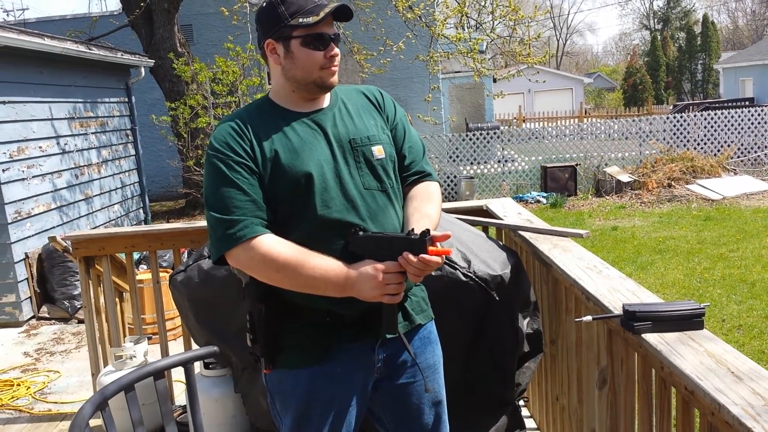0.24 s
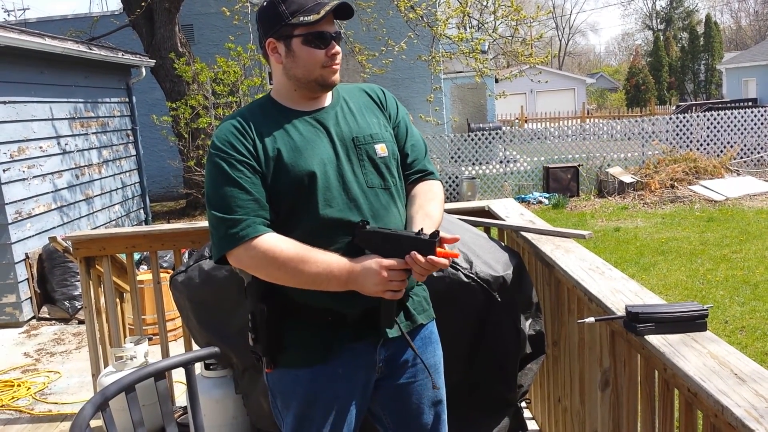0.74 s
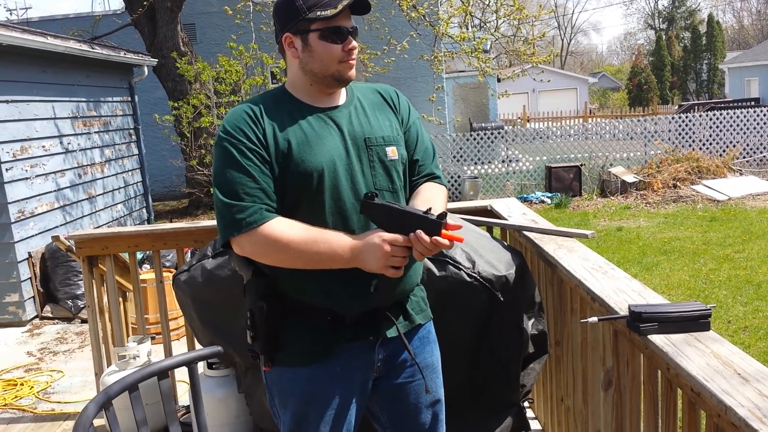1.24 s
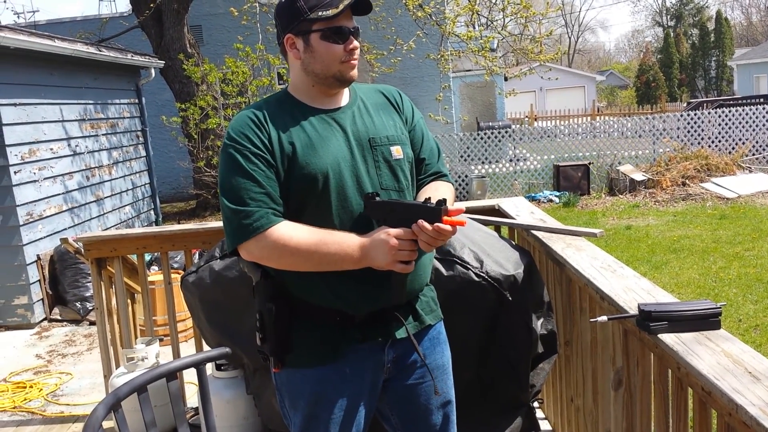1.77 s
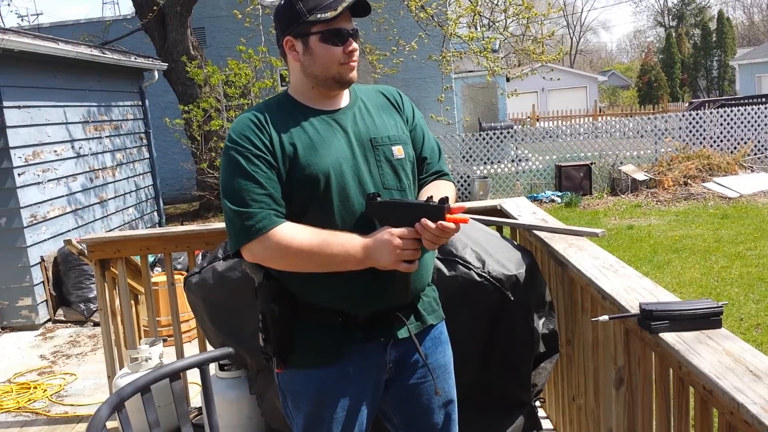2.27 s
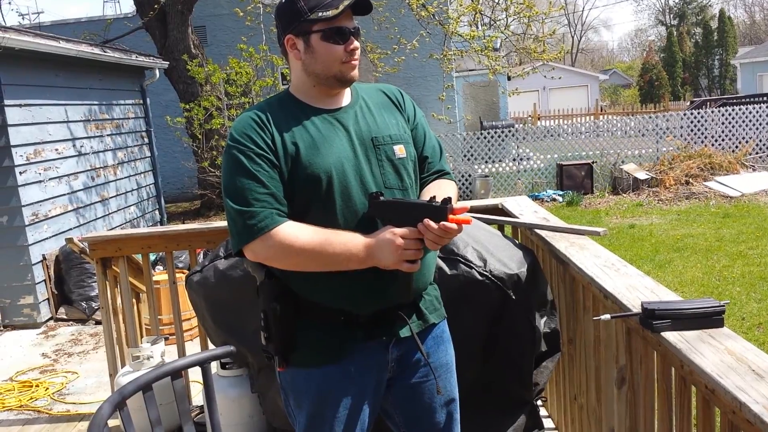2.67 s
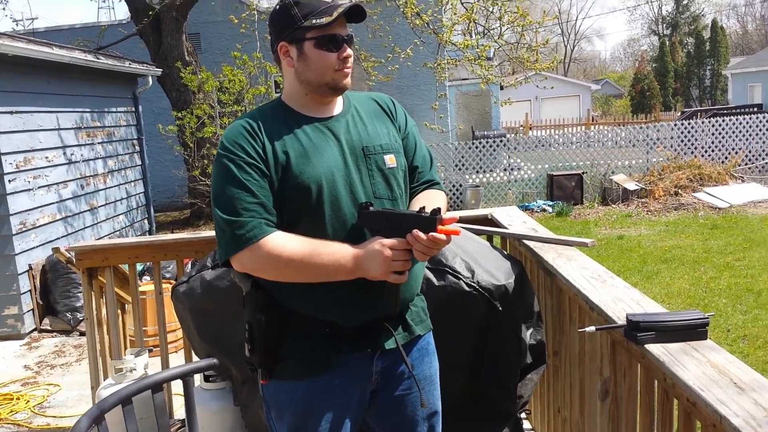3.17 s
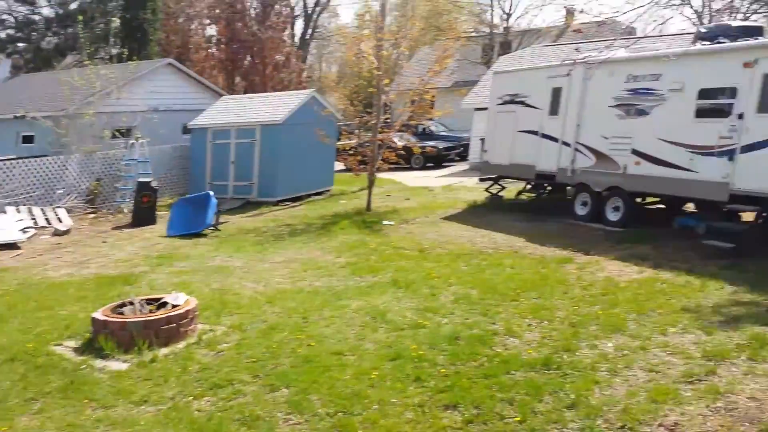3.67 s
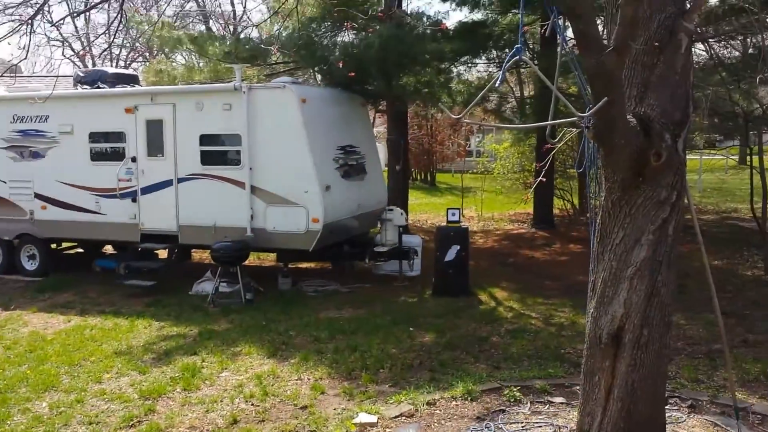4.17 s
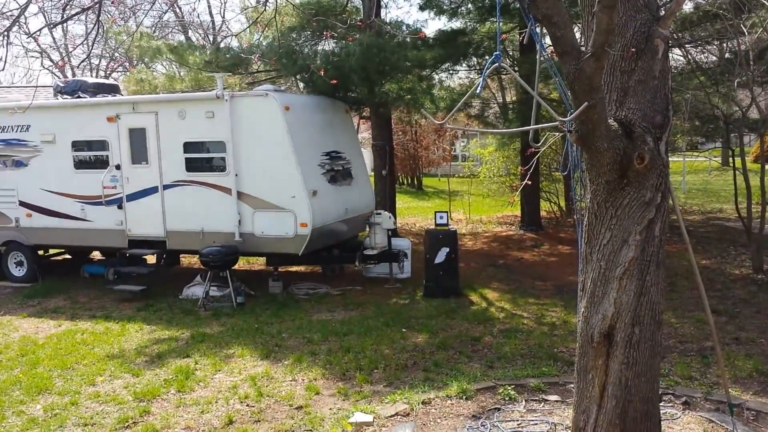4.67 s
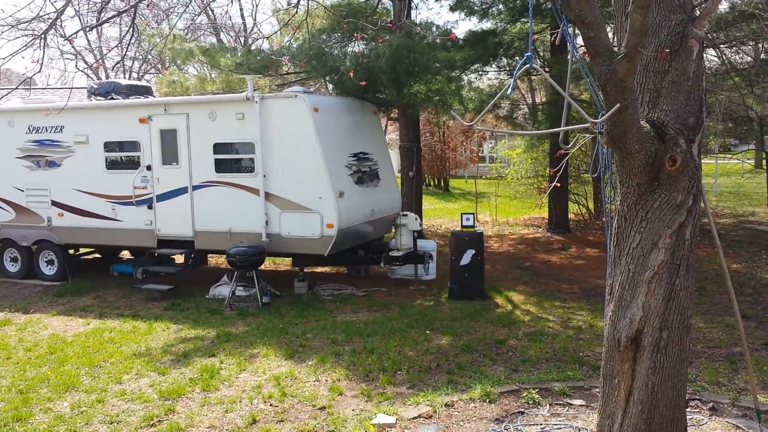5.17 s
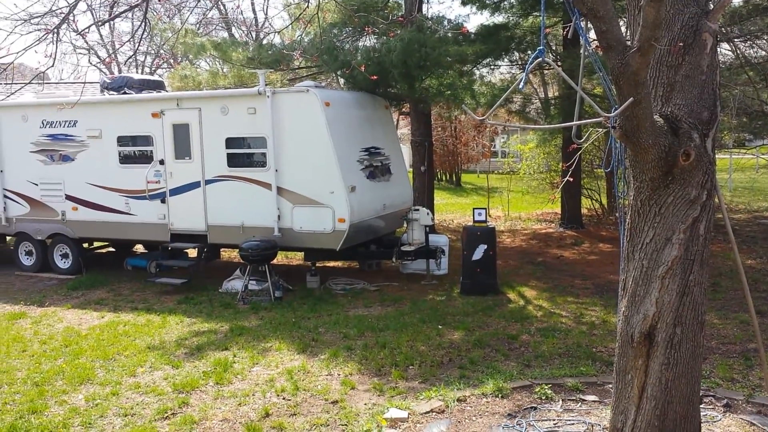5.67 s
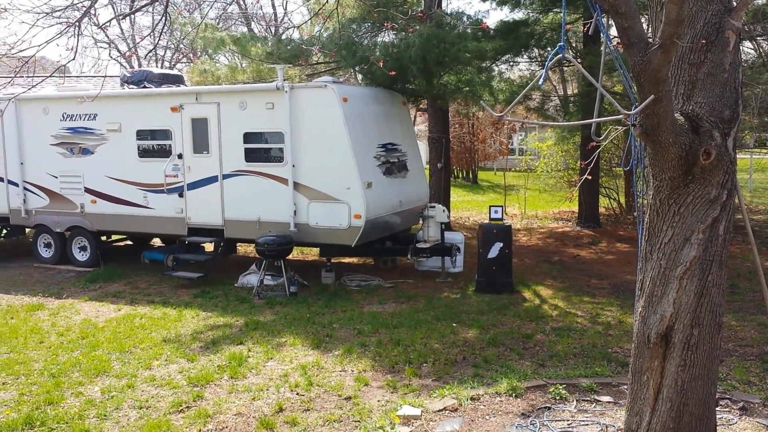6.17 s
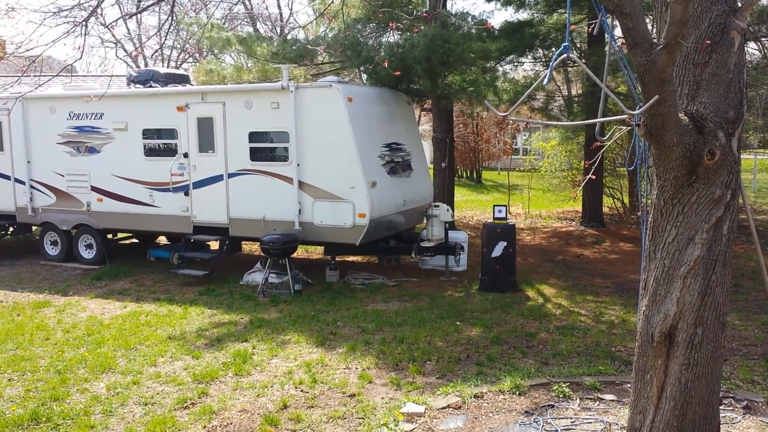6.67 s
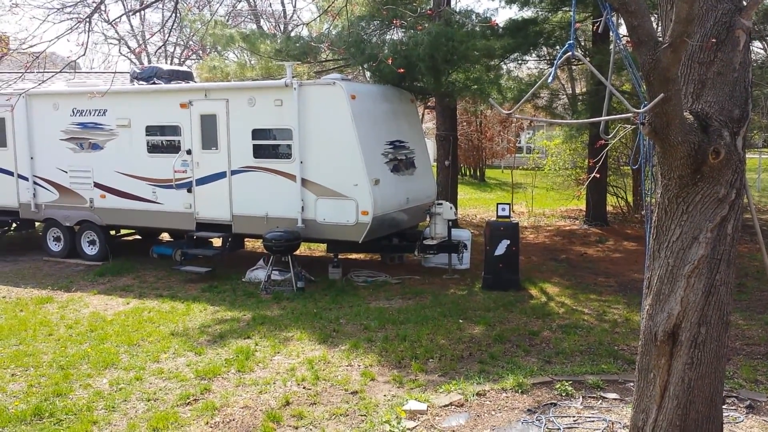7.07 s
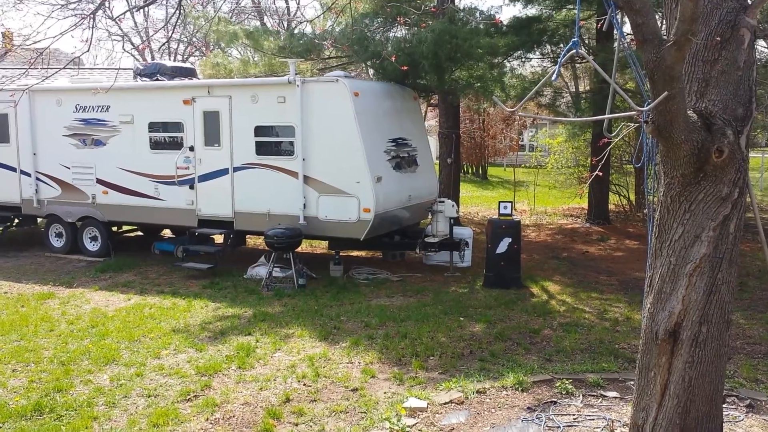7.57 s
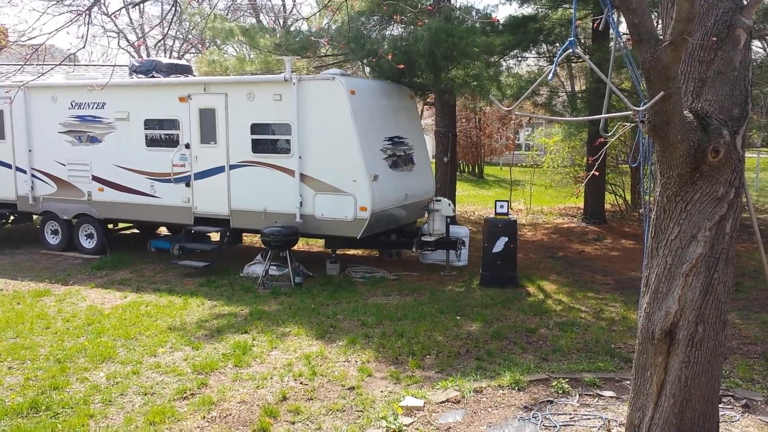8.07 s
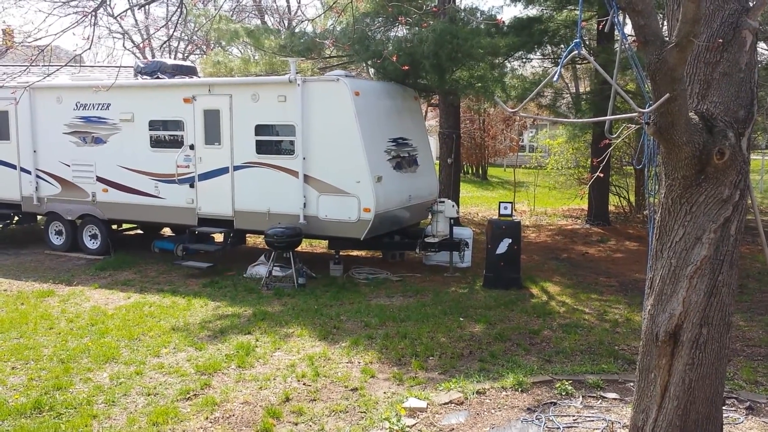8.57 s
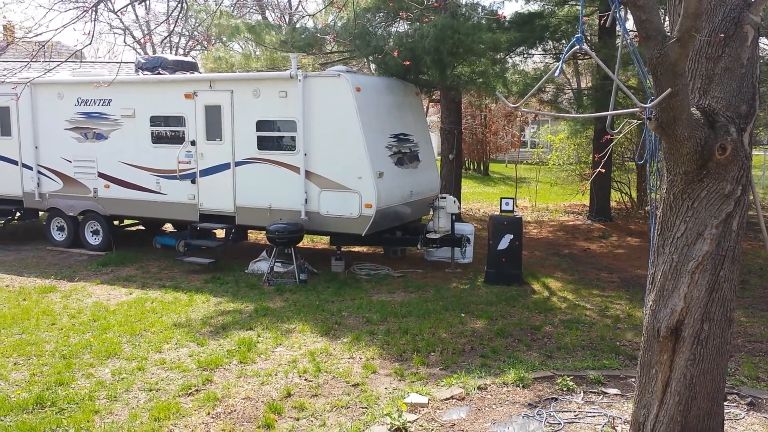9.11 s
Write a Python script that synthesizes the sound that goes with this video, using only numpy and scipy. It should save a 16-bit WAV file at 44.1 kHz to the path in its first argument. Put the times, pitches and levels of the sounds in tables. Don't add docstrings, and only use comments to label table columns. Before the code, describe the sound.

A small electric pellet gun rattles off five steady bursts of sharp plastic clacks outdoors, with loose pellets shaken in the pauses.

```python
import sys
import numpy as np
from scipy import signal
from scipy.fft import rfft, irfft, next_fast_len
from scipy.io import wavfile
from scipy.ndimage import uniform_filter1d, minimum_filter1d, map_coordinates

SR = 44100
rng = np.random.default_rng(int(sys.argv[2]) if len(sys.argv) > 2 else 0)


def master(y):
    cut = np.clip(np.atleast_2d(y).T, -1, 1)
    pcm = np.round(cut * 32767)
    wavfile.write(sys.argv[1], SR, pcm.astype(np.int16))


def attenuation_scalar(level_db):
    decades = np.asarray(level_db, float) / 20
    return 10 ** decades


N = 411978


def along(points, hz, axis=1):
    table = np.array(points)
    return np.interp(np.log(hz + 1), np.log(table[:, 0] + 1), table[:, axis])


def curve(rows, outside=()):
    s, value = np.transpose(rows)
    return np.interp(np.arange(N) / SR, s, value, *outside)


def coloured(x, gain_db):
    size = next_fast_len(x.shape[-1] + 4096, True) // 2 * 2
    gain = attenuation_scalar(gain_db(np.fft.rfftfreq(size, 1 / SR)))
    cepstrum = irfft(np.log(gain + 1e-6), size)
    cepstrum[1:size // 2] *= 2
    cepstrum[size // 2 + 1:] = 0
    return irfft(rfft(x, size) * np.exp(rfft(cepstrum)), size)[..., :x.shape[-1]]


def unit(x):
    return x / np.sqrt(np.mean(x ** 2) + 1e-20)


def pair(source, alike):
    turn = np.arccos(np.clip(alike, -1, 1)) / 2
    shared, apart = np.cos(turn) * source(), np.sin(turn) * source()
    return np.array([shared + apart, shared - apart])


def wobble(rate):
    knots = rng.standard_normal(int(N * rate / SR) + 4)
    return map_coordinates(knots, [np.arange(N) * rate / SR])


def shaped(x, envelope):
    noise = x * envelope
    return noise * np.linalg.norm(envelope) / np.linalg.norm(noise, axis=1, keepdims=True)


# frequency in [Hz], level in [dB].
YARD = [(18, -25), (30, 5.5), (167, -2), (460, 3), (524, -1.5), (1600, -2.5), (2190, 1), (3500, -23),
        (6360, -20), (12500, -46), (15000, -49)]
# start in [s], level in [dB], pitch in [Hz].
PUFF = (2.92, -10, 113)


def yard():
    air = coloured(pair(lambda: rng.standard_normal(N), 0.87), lambda hz: along(YARD, hz))
    low_pass = signal.butter(2, 300, fs=SR, output="sos")
    breeze = signal.sosfilt(low_pass, rng.standard_normal((2, N)))
    flutter = attenuation_scalar(2 * wobble(1.5) + 3 * np.array([wobble(9), wobble(9)]))
    gusts = attenuation_scalar([[-68], [-72]]) * flutter
    s, db, hz = PUFF
    late = np.maximum(np.arange(N) / SR - s, 0)
    puff = attenuation_scalar(db - 60 * late / 0.011) * np.sin(2 * np.pi * hz * late) * attenuation_scalar([[4], [-4]])
    return attenuation_scalar(-60.0 + wobble(1.7)) * unit(air) + gusts * unit(breeze) + puff


# slam in [s], slam level in [dB], nozzle click earlier by [ms], click level in [dB].
FIRST = [(.0032, 3, 23.5, -60), (0.1225, -3, 24, -5.5), (0.241, 2.5, 23.9, -4.5), (0.3611, 3, 25, -5),
         (0.4809, 3, 23.8, -4), (.601, 4, 29, -32), (0.7216, 2.5, 23.3, -5.5), (0.8412, 2.5, 24, -4.3),
         (0.9615, -1, 25.6, -8.5)]
SECOND = [(1.957, -4.5, 36, -0.5), (2.0797, -5.3, 23.73, -3.5), (2.1995, 1.5, 26.2, -21),
          (2.3209, -3.5, 24.64, -5), (2.4394, 1, 22.26, -3), (2.5604, 2.5, 24.3, -8),
          (2.6804, 1, 23.8, -4.5), (2.8009, 2, 24.07, -4.5), (2.92, 4.5, 26.4, -34), (3.0415, 3, 26.3, -35),
          (3.164, -7, 26.1, -7), (3.2832, 3, 23.6, -5.5), (3.4047, 0.5, 23.7, 1.5),
          (3.5245, 3, 21.76, -3.5), (3.6451, -1, 24.45, -1.5), (3.7664, 1.5, 29.1, -34),
          (3.8861, -9.5, 22.96, -5.5), (4.0065, -2, 23.9, -10), (4.1267, -2.5, 24.26, -11),
          (4.247, -1.5, 23.5, -60), (4.3698, -8.5, 23.5, -60), (4.4893, -7, 22.87, -9),
          (4.6093, -5, 26.9, -41), (4.7288, -3.5, 24.4, -45), (4.8507, -15, 25, -12)]
THIRD = [(5.4788, -16.5, 27.1, -13), (5.6, -6.5, 23.53, -13.5), (5.7193, -4, 21.43, -10),
         (5.8411, 2.5, 23.5, -60), (5.9625, -10, 22.9, -6.5), (6.0832, -3.5, 23.9, -5.5),
         (6.2046, -1.5, 25.13, -7), (6.3251, -3, 24.26, -8), (6.445, 0, 25.2, -7),
         (6.5662, -0.5, 23.14, -7.5), (6.688, -2, 24.2, -8.5), (6.8092, -2, 22.84, -5.5)]
FOURTH = [(7.3483, -5.5, 28.9, -11), (7.4717, -2.5, 23.4, -7.5), (7.5925, -4.5, 23.5, -60),
          (7.715, -8, 25.2, -7.5), (7.8355, -4, 23.5, -60), (7.9568, -10, 23.1, -11),
          (8.0782, -1.5, 23.8, -10)]
FIFTH = [(8.5296, -11, 31.1, -14.5), (8.6526, -10.5, 23.5, -60), (8.778, -10.5, 25.4, -4),
         (8.897, -9, 23.86, -14), (9.0182, -1, 25.15, -8), (9.1391, -3, 23.55, -7),
         (9.261, -3.5, 25.6, -6.5)]
SILENT_DB = -45


def contacts():
    s, slam_db, lead_ms, click_db = np.transpose(FIRST + SECOND + THIRD + FOURTH + FIFTH)
    heard = click_db > SILENT_DB
    slams = np.c_[s, slam_db]
    clicks = np.c_[s - lead_ms / 1000, click_db][heard]
    rows = np.r_[slams, clicks]
    return rows, np.arange(len(rows)) >= len(s)


def after(marks, shape):
    return np.abs(signal.fftconvolve(marks, shape)[:N])


def lull(depth):
    rows, click = contacts()
    starts = np.maximum(rows[~click, 0] - .0165, 0)
    marks = np.bincount(np.round(starts * SR).astype(int), minlength=N)
    return 1 - np.clip(depth * after(marks, np.hanning(800)), 0, 1)


# time in [s], level in [dB].
GEARS = [
    [(0, -41.5), (.97, -42), (1.07, -55)],
    [(1.92, -39.5), (3.5, -40.5), (4, -43.5), (4.86, -50), (4.95, -62)],
    [(5.45, -45), (6.82, -41), (6.92, -52)],
    [(7.32, -43), (8.09, -45.5), (8.18, -56.5)],
    [(8.5, -44.5), (9.34, -42)],
]
# frequency in [Hz], level in [dB].
WHIRR = [(150, -14), (600, -9), (1100, -11), (1500, -7.5), (1850, 3), (2030, 0.5), (2220, -3), (2700, -5.5),
         (3500, -8.5), (7000, -26), (14000, -16)]
# share of speed [0-1], arch length in [s].
ARCH = (.1, .1)


def gears():
    rows, click = contacts()
    slams = rows[~click, 0]
    t = np.arange(N) / SR
    since = t - slams[np.maximum(np.searchsorted(slams, t) - 1, 0)]
    load = attenuation_scalar(60 * (np.clip(since, 0, .1) - 0.09))
    noise = coloured(pair(lambda: rng.standard_normal(N), 1.0), lambda hz: along(WHIRR, hz))
    speed = 1 + ARCH[0] * (np.sin(np.pi * np.clip(since / ARCH[1], 0, 1)) - .5)
    turned = np.cumsum(speed / speed.mean())
    noise = np.array([np.interp(turned, np.arange(N), side) for side in noise])
    power = 0
    for held in GEARS:
        run_on = (held[-1][0] + .025, held[-1][1])
        power = power + attenuation_scalar(2 * curve([*held, run_on], (-120, -120)))
    return np.sqrt(power) * attenuation_scalar(5.5) * load * lull(0.67) * unit(noise * attenuation_scalar(4.0 * wobble(70)))


# full at [s], hand stops at [s], level in [dB], first drop in [dB], then fade in [dB/s].
SHAKES = [
    (1.005, 1.005, -39, 5, 106),
    (1.276, 1.679, -27, 9.5, 113),
    (4.946, 5.21, -32.5, 1.5, 56),
    (6.848, 6.855, -41, 7, 300),
    (6.945, 7.228, -30.5, 5, 69),
    (8.117, 8.116, -44, 3, 170),
    (8.2, 8.425, -37, -3, 85),
]
# time in [s], level in [dB].
STROKES = [(1.184, 18), (1.365, 5), (1.55, 5.5), (1.59, -4), (1.75, 7.5), (5.0, 3), (5.1, 2.5),
           (5.43, -0.5), (7.16, 1), (7.281, 6), (8.31, 4.5), (8.4, 4.5)]
STROKE_S = 0.041
STIR_DB_PER_S, TIRE_DB_PER_S, DROP_S = 650, 2.5, 0.026


def stirring():
    t = np.arange(N) / SR
    strokes = sum(db * np.exp(-((t - s) / STROKE_S) ** 2) for s, db in STROKES)
    power = 0
    for full, stop, db, drop_db, fade in SHAKES:
        hold = np.minimum(STIR_DB_PER_S * (t - full), -TIRE_DB_PER_S * (t - full))
        drop = drop_db * np.clip((t - stop) / DROP_S, 0, 1)
        settling = fade * np.maximum(t - stop, 0)
        power = power + attenuation_scalar(2 * (db + strokes + hold - drop - settling))
    return power


# frequency in [Hz], level in [dB].
PELLET = [(300, -30), (1000, -4), (1800, -1), (2250, 7), (2800, 5), (3500, 2.5), (4600, 0), (5300, 2),
          (6500, -1), (7500, 1.5), (8400, 9.5), (9500, 6.5), (12000, 7), (14600, 4.5)]


def pellets():
    rows, click = contacts()
    slams = rows[~click]
    marks = np.bincount(np.round(slams[:, 0] * SR).astype(int), attenuation_scalar(0.3 * slams[:, 1]), N)
    t = np.arange(SR // 3) / SR
    settle = (1 - np.exp(-t / 0.0052)) * (attenuation_scalar(2 * (-24.5 - 380 * t)) + attenuation_scalar(2 * (-32.5 - 120 * t)))
    power = after(marks, settle) * lull(0.72) ** 2 + stirring()

    def ticks():
        hits = rng.random(N) < 9000 / SR
        return hits * rng.standard_normal(N) * attenuation_scalar(0.53 * rng.exponential(size=N))

    clumps = attenuation_scalar(1.56 * wobble(180) + wobble(30))
    grains = coloured(pair(ticks, 0.38), lambda hz: along(PELLET, hz))
    return np.sqrt(power) * unit(clumps * grains)


# time in [s], share of the delay [0-1], share of the colour [0-1].
TURN = [
    (3.55, 0.05, 0.01),
    (3.77, 0.29, 0.11),
    (4.0, 1, 0.3),
    (4.15, 1, 0.31),
]
SIDE_ON_DB = 4.5
KNOCK_LAG, SHARP_LAG, CHANCE_DB = 0.89, 0.36, 1.24


def character(kind, s, db, pan_db=0, extra_db=0):
    away = np.clip(np.interp(s, *np.array(TURN)[:, ::2].T), 0, 1)
    knock_db, side_db, t60, sharp_db = (1 - away) * np.array(kind[0]) + away * np.array(kind[1])
    sharp_db += extra_db + SIDE_ON_DB * np.sin(np.pi * away) ** 2
    luck = CHANCE_DB * rng.standard_normal(3)
    knock_db += luck[0] - KNOCK_LAG * db
    sharp_db += luck[2] - SHARP_LAG * db
    return s, db, knock_db, side_db + pan_db + luck[1], t60, sharp_db


# body knock in [dB], left-right in [dB], t60 in [s], sharpness in [dB].
SLAM = [
    (-19.5, -0.7, .028, -17),
    (-23, 2.4, 0.057, -19.5),
]
CLICK = [
    (-28.5, 0.5, 0.028, -18),
    (-28.5, 7.9, 0.061, -24),
]
RICOCHET = [
    (-43, 0, 0.028, -31),
    (-31, 0, 0.011, -24.5),
]
# time in [s], peak in [dB], left-right in [dB], sharper by [dB].
STRAY = [
    (2.1557, -24, -6, 0),
    (2.7569, -34, -5, 0),
    (5.2536, -14.5, 6, 7),
    (6.641, -35, -4, -17),
    (6.95, -23, 13, -10),
    (8.842, -11, -3, 5),
    (9.0986, -11.5, -7, -0.5),
    (9.2002, -9, -14, 6),
]
# frequency in [Hz], level in [dB], t60 in [s].
SHELL = [(311, 0, 0.011), (550, -6, 0.025), (1057, -5.5, 0.027), (1827, -12.5, 0.064), (1882, -8.5, 0.046),
         (2345, -10.5, 0.02)]
# level in [dB], rise in [dB/s].
RUN_UP = (-26, 1500)
# size over the chatter in [dB], delay in [s], gain per dB of peak in [dB].
TOUCH = (18, .0004, .4)


def blows():
    out, lead = np.zeros((2, N + 4096)), 440
    t = (np.arange(2600) - lead) / SR
    late = np.maximum(t, 0)
    lows = signal.butter(2, 2800, fs=SR, output="sos")
    highs = signal.butter(2, 7200, "high", fs=SR, output="sos")
    rows, clicks = contacts()
    table = [character(CLICK if click else SLAM, *row) for row, click in zip(rows, clicks)]
    table += [character(RICOCHET, *row) for row in STRAY]
    no_piston = [*clicks, *[True] * len(STRAY)]

    def noise():
        return rng.standard_normal(len(t))

    for (s, db, knock_db, pan_db, t60, sharp_db), click in zip(table, no_piston):
        chatter = attenuation_scalar(2.35 * map_coordinates(rng.standard_normal(90), [np.arange(len(t)) / 30]))
        crack = 1.49 * attenuation_scalar(-60 * late / 0.0027)
        tail = attenuation_scalar(-2 - 60 * late / np.clip(t60, .008, .08))
        fall = (1 - np.exp(-late / 0.00029)) * (crack + tail)
        run_up = (t < 0) * (not click) * attenuation_scalar(RUN_UP[0] + RUN_UP[1] * t)
        snap = shaped(pair(noise, 0.51) * chatter, fall + run_up)
        snap[:, lead + round(TOUCH[1] * SR)] += attenuation_scalar(TOUCH[0] + TOUCH[2] * db + rng.normal())
        snap -= signal.sosfilt(lows, snap)
        snap += (attenuation_scalar(sharp_db + 22.0) - 1) * signal.sosfilt(highs, snap)
        body = (1 - np.exp(-late / 0.00064)) * attenuation_scalar(-60 * late / 0.035)
        knock = attenuation_scalar(1.5) * pair(noise, 0.95) * (body + run_up)
        thud = signal.sosfilt(lows, knock)
        thud *= 3.02 / np.linalg.norm(thud, axis=1, keepdims=True)
        ring = 0
        for hz, ring_db, decay in SHELL:
            ring = ring + attenuation_scalar(ring_db + rng.normal() - 60 * late / decay) * np.sin(2 * np.pi * hz * late)
        blow = attenuation_scalar(db - 10.5) * (snap + attenuation_scalar(knock_db + 23.5) * (thud + attenuation_scalar(-11.5) * ring))
        blow *= attenuation_scalar([[pan_db / 2], [-pan_db / 2]])
        start = round(s * SR) - lead
        out[:, max(start, 0):start + len(t)] += blow[:, max(-start, 0):]
    return out[:, :N]


# delay in [s], left in [dB], right in [dB].
ECHOES = [(.0038, -15.5, -9.5), (.0075, -39, -17.5), (0.013, -36, -31), (0.0223, -20.5, -24)]
# level in [dB], t60 in [s].
SCATTER = (-14.5, 0.36)


def reflected(x):
    db, t60 = SCATTER
    t = np.arange(SR // 5) / SR
    smear = rng.standard_normal((2, len(t))) * attenuation_scalar(-60 * t / t60) * (1 - np.exp(-t / 0.021))
    response = attenuation_scalar(db) * smear / np.linalg.norm(smear[0])
    for delay, left_db, right_db in ECHOES:
        blur = rng.standard_normal(16) / 4
        response[:, round(delay * SR):][:, :16] += attenuation_scalar([[left_db], [right_db]]) * blur
    response[:, 0] = 1
    return signal.fftconvolve(x, response, axes=1)[:, :N]


# frequency in [Hz], left in [dB], right in [dB].
FACING = [(162, -28.5, -32), (372, -23, -27.5), (520, -29, -28.5), (993, -12, -12.5), (1733, -13.5, -16.5),
          (2090, -8, -8.5), (2780, -17, -25), (4370, -13, -10.5), (5610, 0, 2), (6470, 5.5, -0.5),
          (7180, 2, 1.5), (8530, -18, -10), (10570, -19.5, -11.5), (13700, -24.5, -24.5)]
AWAY = [(158, -36.5, -27.5), (568, -13.5, -12), (807, -17.5, -17.5), (1000, -13, -15), (1770, -8.5, -13.5),
        (2980, -9, -15), (3500, -7.5, -10.5), (4150, -13.5, -8), (4500, 1.5, 2), (5200, -4, 3),
        (5420, 4, -17.5), (6970, 1.5, -8.5), (7620, -30, -0.5), (13020, -38, -31)]


def camera(x):
    s, delay, colour = np.transpose(TURN)
    lag = 9.54 * curve(np.transpose([s, delay]))
    away = np.clip(curve(np.transpose([s, colour])), 0, 1)
    ports = []
    for c, side in enumerate((1, -1)):
        late = map_coordinates(x[c], [np.arange(N) - side * lag])

        def port(table):
            return coloured(late, lambda hz: along(table, hz, axis=1 + c) + 10 - 22 * (hz > 14850))

        facing = attenuation_scalar(0.54 * side) * port(FACING)
        turned = attenuation_scalar(3.5 + 1.9 * side) * port(AWAY)
        ports.append((1 - away) * facing + away * turned)
    return np.array(ports)


def scene():
    return camera(reflected(blows()) + pellets() + gears()) + yard()


BUDGET_DB = 4


def muted(x, margin, size, step, count, attack_db):
    hz, t, z = signal.stft(x, SR, nperseg=size, window="cosine")
    bands = np.add.reduceat(np.abs(z) ** 2, np.arange(0, len(hz), step), axis=1).mean(axis=0, keepdims=True)
    budget_db = BUDGET_DB * uniform_filter1d(rng.standard_normal(bands.shape), size=2)
    strongest = -minimum_filter1d(-bands.sum(axis=1, keepdims=True), size=count, axis=2)
    margin_db = along(margin, hz[::step] + step * hz[1] / 2)[:, None]
    floor = strongest * attenuation_scalar(2 * margin_db + 2 * budget_db)
    power = uniform_filter1d((x ** 2).mean(axis=0), size=128)
    peak = -minimum_filter1d(-power, size=size)
    crest = peak / (np.abs(uniform_filter1d(power, size=size)) + 1e-12)
    attack = np.interp(t * SR, np.arange(N), crest) > attenuation_scalar(2 * attack_db)
    kept = np.repeat((bands > floor) | attack, step, axis=1)[:, :len(hz)]
    return signal.istft(z * kept, SR, nperseg=size, window="cosine")[1][:, :N]


def top_cut(x):
    return signal.sosfilt(signal.butter(12, 15690, fs=SR, output="sos"), x)


# frequency in [Hz], level in [dB].
MUTE = [(100, -41), (300, -36.5), (800, -34), (1150, -45), (2700, -36), (3200, -26), (4000, -27),
        (5500, -54), (11000, -40.5), (14000, -36.5)]
MUTE_SHORT = [(300, -46), (1000, -59), (7000, -59), (9500, -52), (12000, -46), (14000, -41)]
ATTACK_DB = 7.5


def record(dry):
    thin = signal.sosfilt(signal.butter(2, 60, "high", fs=SR, output="sos"), dry)
    clipped = thin / (1 + np.abs(thin / .88) ** 8) ** (1 / 8)
    long_muted = muted(clipped, MUTE, 2048, 8, 1, ATTACK_DB)
    mix = muted(long_muted, MUTE_SHORT, 256, 4, 9, np.inf)
    return top_cut(mix)


dry = scene()
out = record(dry)
master(out)
```